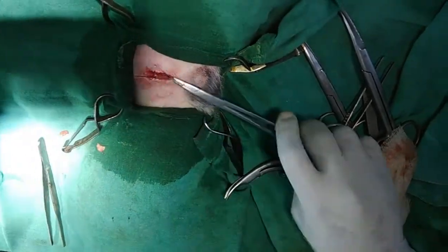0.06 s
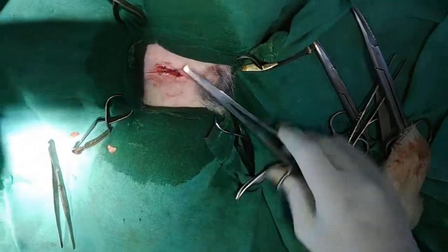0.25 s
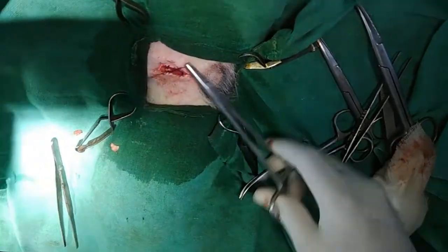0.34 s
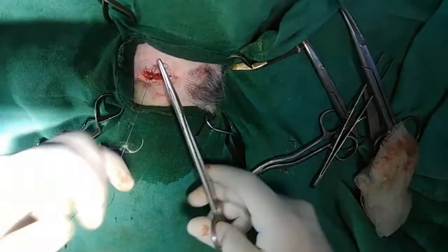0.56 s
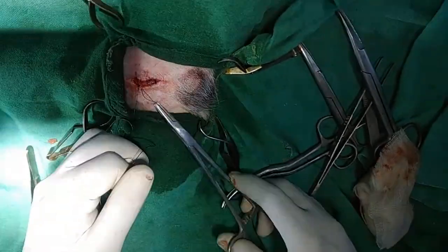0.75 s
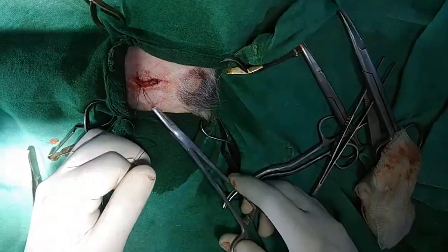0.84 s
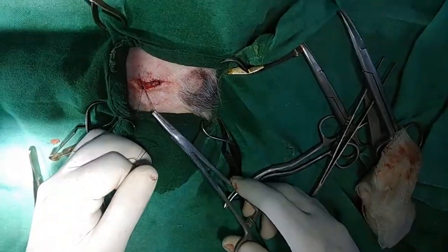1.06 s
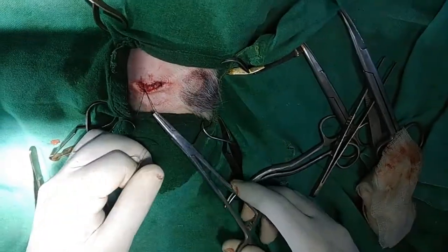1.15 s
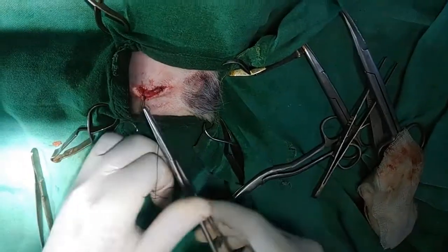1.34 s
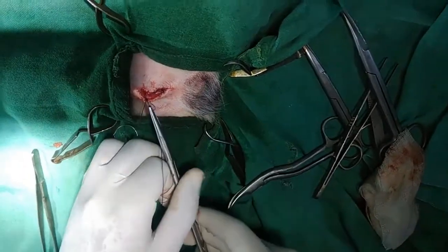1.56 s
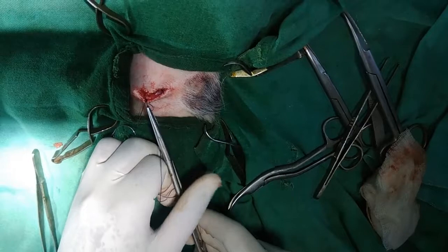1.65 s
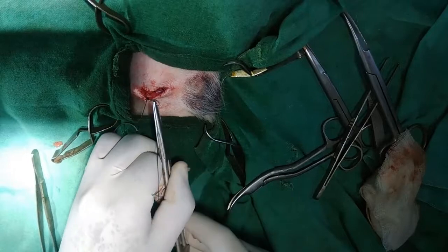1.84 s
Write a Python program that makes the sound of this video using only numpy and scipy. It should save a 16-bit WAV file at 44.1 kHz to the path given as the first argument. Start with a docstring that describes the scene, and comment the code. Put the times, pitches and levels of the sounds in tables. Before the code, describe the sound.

Close up in a quiet, hard-walled room, a surgical clamp is handled with small steel ticks and rubber glove rustles, then clicks sharply in two separate pairs. A soft thread rub follows, over a low ventilation hum.

```python
"""A steel surgical clamp is worked close up in a quiet, hard-walled room, over a ventilation hum.
A faint ring dies away as cloth and thread rub softly, the steel ticks and gloves rustle on it.
The handles knock once, then the ratchet snaps twice, jaws loose; the room's ring stops abruptly.
After a lull it snaps twice more, jaws pressed shut. A soft rub, rustles and light ticks close the scene."""
import sys
import numpy as np
from scipy import signal
from scipy.fft import rfft, irfft, next_fast_len
from scipy.io import wavfile

SR = 44100
rng = np.random.default_rng(int(sys.argv[2]) if len(sys.argv) > 2 else 0)


def transcribe(u):
    """Save the signal u as a 16-bit wav file named by the first command-line argument.

    u: samples, shape (n,) or (channels, n), limited to [-1, 1]; the rate is SR.
    q: integer samples, one column per channel.
    """
    v = np.clip(np.atleast_2d(u).T, -1, 1)
    q = np.round(v * 32767).astype(np.int16)
    wavfile.write(sys.argv[1], SR, q)


N = 83790
HIT_SAMPLES = 2048
LEFT_LAG_S = .00014  # the steel reaches the left ear slightly later


def amp(db):
    """Decibels to gain."""
    return 10 ** (np.asarray(db) / 20)


def unit(x):
    """Scales to rms 1."""
    return x / np.sqrt(np.mean(x ** 2) + 1e-20)


def read(points, hz):
    """Reads a curve on a log-frequency axis."""
    f, value = np.transpose(points)
    return np.interp(np.log(hz + 1), np.log(f + 1), value)


def colour(x, points):
    """EQs by a curve of f/Hz, gain/dB."""
    size = next_fast_len(2 * x.shape[-1])
    gain = amp(read(points, np.fft.rfftfreq(size, 1 / SR)))
    return irfft(rfft(x, size) * gain, size)[..., :x.shape[-1]]


def noise(spectrum, size, right_eq=None, likeness=.26):
    """Wide, coloured stereo noise; the part both sides share reaches the right first."""
    left, other = (unit(colour(white, spectrum)) for white in rng.standard_normal((2, size)))
    early = irfft(rfft(left) * np.exp(2j * np.pi * np.fft.rfftfreq(size, 1 / SR) * LEFT_LAG_S), size)
    right = likeness * early + np.sqrt(1 - likeness ** 2) * other
    return np.array([left, colour(right, right_eq) if right_eq else right])


def add(mix, s, sound):
    """Mixes a stereo sound in at s seconds."""
    part = mix[:, max(round(s * SR), 0):][:, :sound.shape[1]]
    part += sound[:, :part.shape[1]]


def fade(t, t60):
    """Full until t = 0, then down 60 dB in t60."""
    return np.exp(-np.log(1000) * np.maximum(t, 0) / t60)


def lean(right_db):
    """Pans by trimming the right channel."""
    return amp([[0], [right_db]])


def ripple(x, depth_db=8, step_hz=110):
    """Random narrow peaks and dips at equal power give the ring an uneven, slightly tonal colour."""
    hz = np.arange(400) * step_hz
    db = depth_db * np.minimum(rng.standard_normal(len(hz)), 1)
    return colour(x, np.transpose([hz, db])) / np.sqrt(np.mean(amp(db) ** 2))


def steel(x, low_cut_hz=920):
    """Cuts away the bass, leaving the steel's sound thin and bright."""
    return signal.sosfilt(signal.butter(4, low_cut_hz, "highpass", fs=SR, output="sos"), x)


def ventilation():
    """A steady bed of moving air, nearly mono in the bass and wide on top."""
    spectrum = [(15, -75.5), (25, -40), (108, -19.5), (130, -9), (249, -1), (354, -12), (516, -12),
                (591, -14), (754, -14), (840, -16), (1070, -18), (1740, -22.5), (2110, -20), (3250, -33.5),
                (13600, -43.5), (14800, -34.5), (16000, -66)]  # low hum and faint hiss: f/Hz, level/dB
    stereo_likeness = [(30, 0.8), (150, 1), (260, 0.86), (500, 0.62), (1500, 0.064), (16000, 0.037)]  # f/Hz, left-right correlation
    likeness = read(stereo_likeness, np.fft.rfftfreq(N, 1 / SR))
    left, other = rfft(rng.standard_normal((2, N)))
    right = likeness * left + np.sqrt(1 - likeness ** 2) * other
    return amp(-68) * unit(colour(irfft(np.array([left, right]), N), spectrum))


def lingering_ring():
    """A faint, bright ring hangs in the room at the start and dies away."""
    spectrum = [(500, -33), (2000, -16), (4000, -9), (7500, -5), (10000, -0.5), (13500, -4.5), (16000, -24)]  # tone of the ring: f/Hz, level/dB
    right_eq = [(3000, -6), (8000, 6.5), (10000, -8.5), (15000, -23)]  # its right-side EQ: f/Hz, gain/dB
    return amp(-61) * ripple(noise(spectrum, N, right_eq)) * fade(np.arange(N) / SR, t60=.9)


def rubs():
    """Cloth and thread rub: soft bands of noise that rise quickly and die away."""
    strokes = [(0.049, 0.017, 1.9, 1720, 130, -68), (0.75, .015, 0.21, 517, 88, -59),
               (0.764, 0.011, 0.38, 1080, 197, -68), (1.542, 0.033, 0.62, 2010, 590, -50),
               (1.549, 0.041, 0.39, 2980, 670, -54), (1.56, 0.02, 0.18, 4350, 800, -57.5)]  # one rub each: t/s, rise/s, t60/s, f/Hz, width/Hz, level/dB
    out, t, f = np.zeros((2, N)), np.arange(N) / SR, np.fft.rfftfreq(N, 1 / SR)
    for s, rise, t60, hz, width, db in strokes:
        band = unit(irfft(rfft(rng.standard_normal((2, N))) / (1 + (2 * (f - hz) / width) ** 4), N))
        out += amp(db) * band * np.clip((t - s) / rise, 0, 1) * fade(t - s - rise, t60)
    return out * lean(right_db=-6)


def ticks():
    """Steel touches steel: a bright tick, sharper or duller with each contact, over a weak lower ring."""
    # light touches: t/s, level/dB, tick t60/s, ring/dB, tick's right trim/dB, top shelf/dB
    contacts = [(0.1468, -30, 0.007, -33.5, -3, -2.5), (.168, -49.5, 0.016, -24.5, 6.5, -2.5),
                (0.2354, -11, 0.007, -23.5, -17, 0.5), (0.244, -30, .005, -24.5, -14.5, -3),
                (0.2537, -10.5, 0.0041, -34.5, -22, -0.5), (.2628, -27.5, .012, -19, -16, 0.5),
                (0.2674, -9, 0.009, -19, -13, 1), (0.2687, -20, .01, -17.5, -10, -0.5),
                (0.4309, -18.5, 0.036, -35.5, -13, -11.5), (0.5211, -16.5, 0.0041, -29.5, -18, -6),
                (1.259, -40, 0.022, -42.5, -22.5, -7.5), (1.767, -42, 0.015, -42, -28, -1),
                (1.848, -31.5, 0.0078, -62, -21, 11), (1.8599, -28, 0.013, -26, -12, 1)]
    tick_spectrum = [(2000, -60), (5000, -26.5), (7500, -22.5), (9300, -2), (11300, 5), (12100, -0.5),
                     (13200, 7.5), (14800, 6), (16000, -0.5), (17000, -11)]  # bright attack: f/Hz, level/dB
    right_eq = [(3000, 16.5), (7500, 26), (10000, 0), (14000, -7.5), (16500, -7.5)]  # its right-side EQ: f/Hz, gain/dB
    ring_spectrum = [(1500, -29.5), (2200, -6.5), (2900, -2), (3600, -4.5), (4300, 4.5), (5100, -0.5),
                     (6000, -3), (7000, -4), (10000, 6.5), (16000, -26.5)]  # lower ring: f/Hz, level/dB
    out, t = np.zeros((2, N)), np.arange(HIT_SAMPLES) / SR
    attack = np.minimum(t / .00024, 1)
    for s, db, t60, ring_db, right_db, top_db in contacts:
        top_shelf = [(12500, 0), (14500, top_db)]  # f/Hz, gain/dB
        tick = colour(noise(tick_spectrum, len(t), right_eq), top_shelf) * lean(right_db) * fade(t, t60)
        ring = amp(ring_db) * noise(ring_spectrum, len(t)) * fade(t, t60=.026)
        add(out, s, amp(db) * attack * (tick + ring))
    return steel(out)


def gloves(slips_per_s=5500, spread_db=1.5):
    """Tiny slips of rubber on steel swell and fade with each move of the hand."""
    moves = [(0.167, 0.12, -47, -12.5), (0.232, 0.014, -38.5, -18), (0.262, 0.0074, -30, -16),
             (0.424, 0.038, -33, -15), (0.49, .07, -43, -29), (1.179, 0.022, -67.5, -14),
             (1.186, 0.29, -64, -7.5), (1.728, 0.11, -61, -19), (1.829, 0.061, -54, -12)]  # hand moves: t/s, length/s, level/dB, right trim/dB
    spectrum = [(2000, -26), (6000, -19.5), (8500, -15.5), (10500, -3), (13000, 2.5), (15300, -5.5),
                (16500, -25.5)]  # crisp rubber grain: f/Hz, level/dB
    out, t = np.zeros((2, N)), np.arange(N) / SR
    slips = rng.standard_normal((2, N)) * (rng.random((2, N)) < slips_per_s / SR)
    slips *= amp(spread_db * np.minimum(rng.exponential(1, (2, N)), 4))
    grains = unit(colour(slips, spectrum))
    for s, length, db, right_db in moves:
        swell = np.sin(np.pi * np.clip((t - s) / length, 0, 1))
        out += amp(db) * lean(right_db) * grains * swell
    return out


def knock():
    """The handles meet with a short, full clack."""
    modes = [(1780, -6, 0.014), (2700, -8.5, .01), (3053, -1, .014), (3620, -5, .01), (4000, 1.5, .016),
             (4940, -8.5, 0.021), (5400, -5.5, .012), (6900, -11.5, .01)]  # ringing handles: f/Hz, level/dB, t60/s
    spectrum = [(1100, -33.5), (1600, -3.5), (3500, 0), (5200, -3), (9000, -10.5), (16000, -29.5)]  # impact noise: f/Hz, level/dB
    out, t = np.zeros((2, N)), np.arange(HIT_SAMPLES) / SR
    ring = sum(amp(db) * fade(t, t60) * np.sin(2 * np.pi * (hz * t + rng.random()))
               for hz, db, t60 in modes)
    crack = amp(-1.5) * noise(spectrum, len(t)) * fade(t, t60=.013)
    attack = np.minimum(t / .0004, 1)
    add(out, s=.4396, sound=amp(-30) * attack * (ring + crack))
    return steel(steel(out))


def ratchet(thud_cycles=6):
    """Each tooth snaps over, chatters and rings the hand-damped steel; returns dry sound and room send."""
    # snaps: t/s, level/dB, chatter/s, crack/dB, body/dB, thud/dB, thud f/Hz, right trim/dB, send/dB
    opening_snaps = [(.4613, -14.5, 0.0033, 0.5, -20.5, -22.5, 1014, 0, -11.5),
                     (.5726, -17, 0.0039, -0.5, -21, -26, 1407, 1.5, -12)]
    closing_snaps = [(1.3288, -22.5, 0.0031, 7.7, -16.5, -33, 1190, -0.49, -11),
                     (1.4109, -16.5, 0.0037, 1.9, -21, -31.5, 464, 0.58, -11.5)]
    # clamp modes, jaws let go and pressed shut: f/Hz, left level/dB, right level/dB, t60/s
    loose_modes = [(1400, -33, -35, .016), (3180, -20, -20, .016), (3550, -28, -27, .014),
                   (4200, -26, -24, .014), (6100, -24, -15, .012), (6620, -20, -18, .01),
                   (7060, -22, -14, .012), (8200, -22, -21, .01), (9950, -8, -17, .008),
                   (11050, -10, -16, .008), (12350, -9, -15, .008), (12750, -8, -14, .008),
                   (13330, -1, -7, .01), (14750, -13, -18, .008), (15500, -12, -17, .008)]
    shut_modes = [(790, -35, -38, .016), (1100, -30, -34, .016), (1400, -30, -33, .016),
                  (1650, -31, -33, .016), (2670, -24, -21, .016), (3370, -23, -21, .018),
                  (3800, -24, -20, .016), (4200, -23, -17, .018), (4650, -26, -22, .018),
                  (5820, -19, -15, .018), (6300, -24, -20, .012), (7070, -17, -13, .012),
                  (7800, -14, -13, .01), (8760, -17, -17, .01), (9900, -6, -9, .008),
                  (10280, -7, -13, .008), (10850, -9, -12, .008), (11820, -6, -12, .008),
                  (13060, 2, -3, .01), (13740, 0, -7, .01), (15420, -8, -10, .008)]
    # a snap's bright crack and midrange body, each with its right-side EQ: f/Hz, level/dB
    crack_spectrum = [(1000, -47.5), (4000, -19), (6000, -19.5), (8500, -11.5), (10000, 2), (12000, 4),
                      (13400, 2.5), (14500, 0), (15500, -17.5), (16800, -26.5)]
    crack_right_eq = [(3000, -3), (7000, 9), (9000, -2), (10500, -14), (16000, -2)]
    body_spectrum = [(100, -29.5), (650, -25.5), (1050, -6), (2000, -5), (3000, -0.5), (4100, -3.5),
                     (5000, -6.5), (7000, -13.5), (16000, -28.5)]
    body_right_eq = [(1000, -11), (2000, 3.5), (3500, 5.5), (8000, 12.5)]
    direct, send = np.zeros((2, 2, N))
    t = np.arange(HIT_SAMPLES) / SR
    ear_t = t + LEFT_LAG_S * np.array([[0], [1]])
    attack = np.minimum(t / .00093, 1)
    first_blow = 1 + .9 * fade(t, t60=.012)  # stands above the chatter
    for snaps, modes in (opening_snaps, loose_modes), (closing_snaps, shut_modes):
        for s, db, chatter_s, crack_db, body_db, thud_db, thud_hz, right_db, send_db in snaps:
            decay_t = t - chatter_s * np.array([[1], [.33]])  # the right side holds more briefly
            ring = np.sqrt(2) * sum(amp([[l_db], [r_db]]) * fade(decay_t, t60)
                                    * np.sin(2 * np.pi * (hz * ear_t + rng.random()))
                                    for hz, l_db, r_db, t60 in modes)
            crack = amp(crack_db) * noise(crack_spectrum, len(t), crack_right_eq)
            body = amp(body_db) * noise(body_spectrum, len(t), body_right_eq)
            burst = (crack + body) * fade(decay_t, t60=.013)
            # the handles give a thud of a few cycles
            swell = np.sin(np.pi * np.minimum(thud_hz * t / thud_cycles, 1)) ** 2
            thud = amp(thud_db) * lean(right_db=-11.5) * swell * np.sin(2 * np.pi * thud_hz * t)
            gain = amp(db) * lean(right_db) * attack * first_blow
            ring, burst, thud = steel(gain * ring), steel(gain * burst), gain * thud
            add(direct, s, ring + burst + thud)
            add(send, s, amp(send_db) * (amp(-2.5) * ring + thud + ripple(burst)))
    return direct, send


def room(send, predelay_s=.0017, build_s=.015, crossfeed=.48):
    """Dense reflections from hard walls, gated shut between the two pairs of snaps."""
    decay_times = [(300, .6), (1200, 0.16), (3000, 0.58), (6000, 0.41), (10000, 0.52), (13000, 0.43),
                   (16000, 0.32)]  # reverb decay: f/Hz, t60/s
    wall_eq = [(300, -7.5), (700, 3), (1200, 11), (3500, 3.5), (7000, 3), (10000, -5), (13000, -5.5),
               (15000, -2.5), (16300, -16)]  # reverb tone: f/Hz, gain/dB
    close_s, reopen_s, fall_db_per_s = .6507, 1.3, 2196
    t = np.arange(N) / SR
    hz, frame_t, bands = signal.stft(rng.standard_normal((2, N)), SR, nperseg=256)
    bands *= fade(frame_t, read(decay_times, hz)[:, None])
    tail = signal.istft(bands, SR, nperseg=256)[1][:, :N]
    tail *= np.clip((t - predelay_s) / build_s, 0, 1)
    tail = colour(tail / np.linalg.norm(tail[0]), wall_eq)
    wet = signal.fftconvolve(send + crossfeed * send[::-1], tail, axes=1)[:, :N]
    gate = amp(-fall_db_per_s * np.maximum(t - close_s, 0) * (t < reopen_s))
    return wet * gate


def scene():
    """Clamp and gloves play up front and feed the room; rubs and room tone sit underneath."""
    snaps, snap_send = ratchet()
    handling, clack = ticks() + gloves(), knock()
    reverb = room(snap_send + amp(-10.5) * ripple(handling) + amp(-9) * ripple(clack))
    return snaps + handling + clack + reverb + rubs() + ventilation() + lingering_ring()


def record(dry):
    """An oversampled soft clip rounds the loudest peaks; a steep low-pass trims the very top."""
    ceiling, edge_hz = .7, 16800
    oversampled = signal.resample_poly(dry, 4, 1, axis=1)
    rounded = signal.resample_poly(ceiling * np.tanh(oversampled / ceiling), 1, 4, axis=1)
    low_pass = signal.firwin(255, edge_hz, window=("kaiser", 9), fs=SR)
    return signal.oaconvolve(rounded, low_pass[None], "same")


dry = scene()
out = record(dry)
transcribe(out)
```